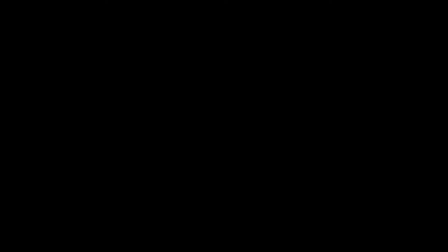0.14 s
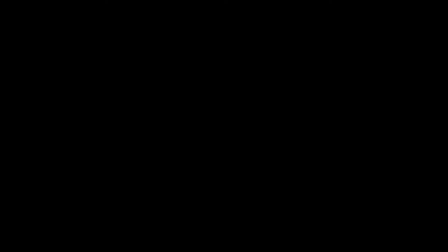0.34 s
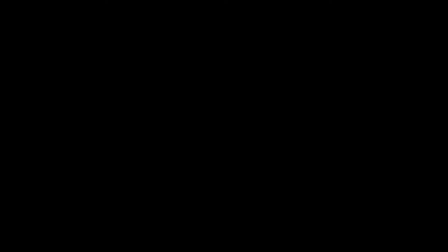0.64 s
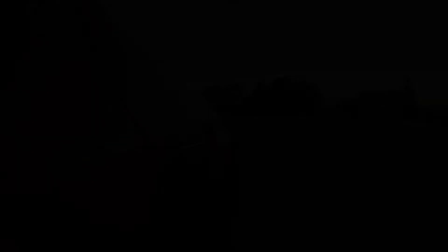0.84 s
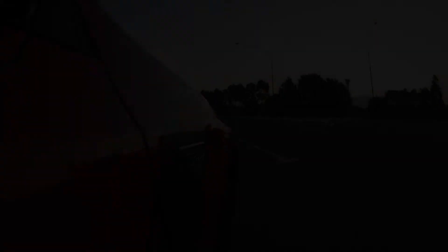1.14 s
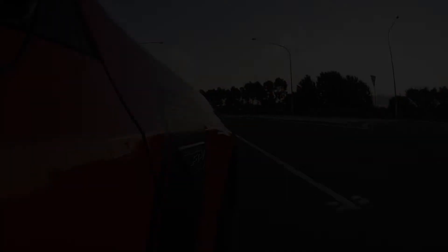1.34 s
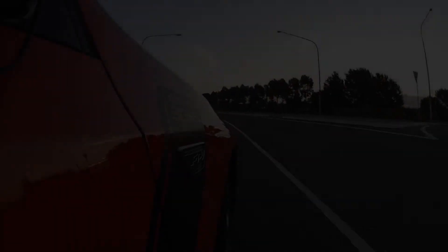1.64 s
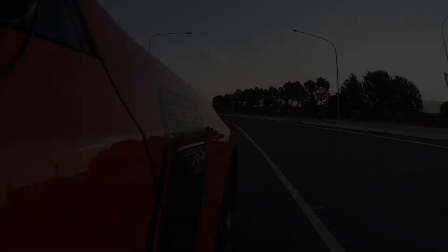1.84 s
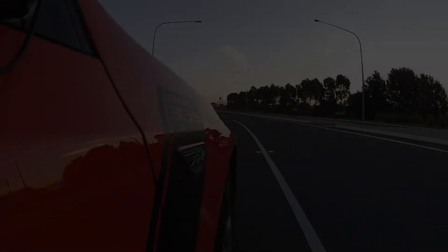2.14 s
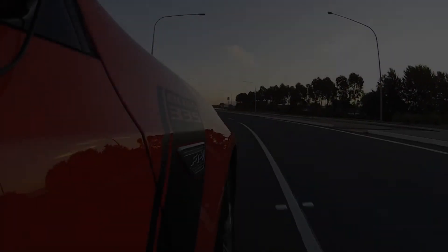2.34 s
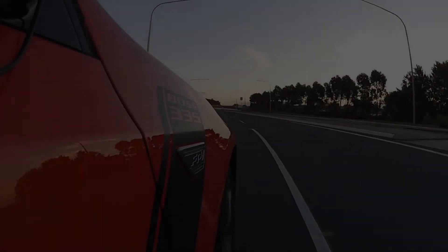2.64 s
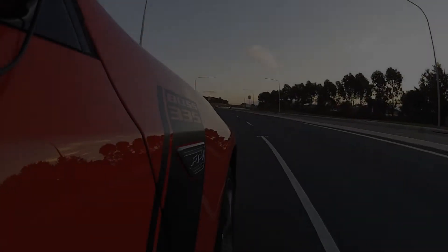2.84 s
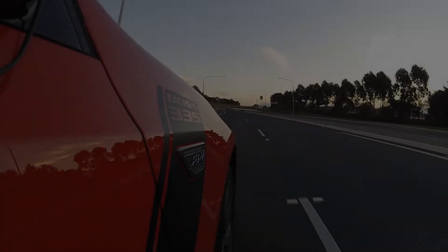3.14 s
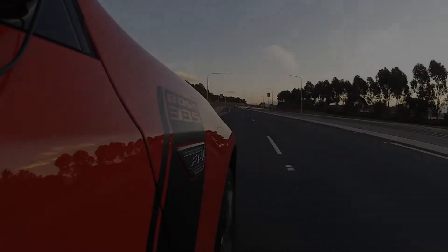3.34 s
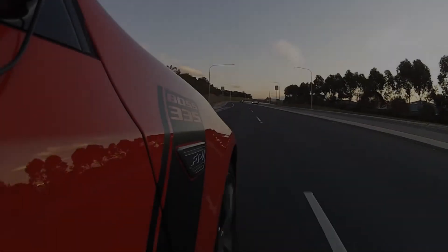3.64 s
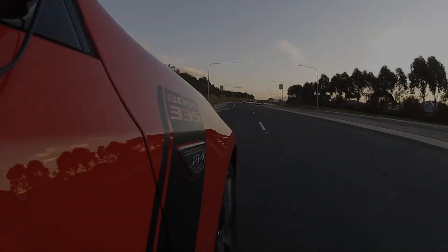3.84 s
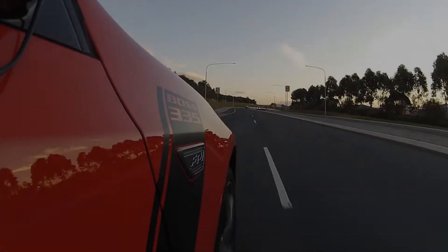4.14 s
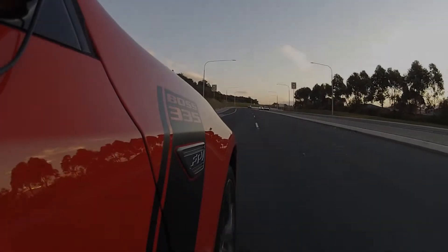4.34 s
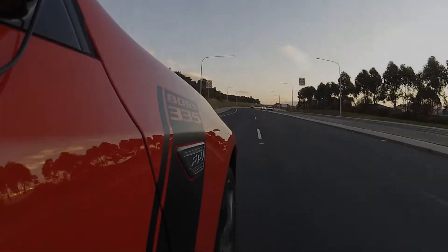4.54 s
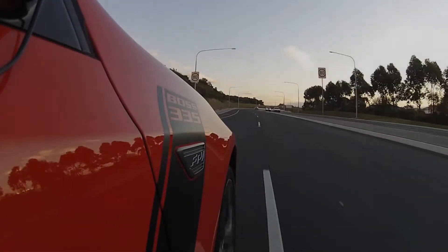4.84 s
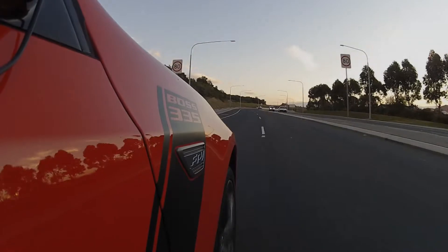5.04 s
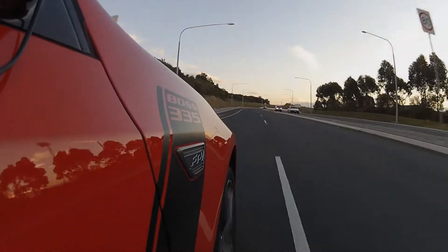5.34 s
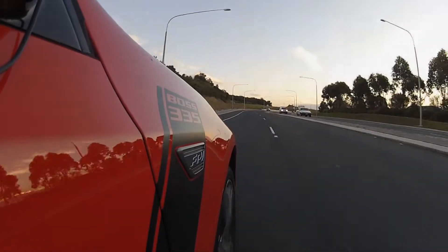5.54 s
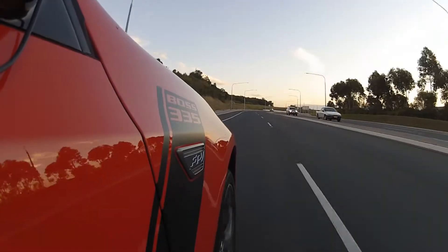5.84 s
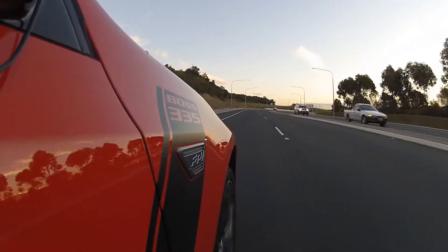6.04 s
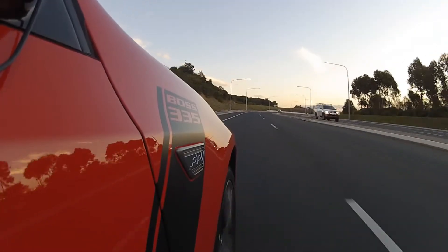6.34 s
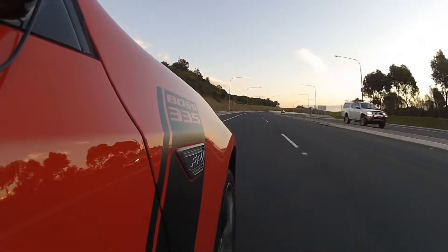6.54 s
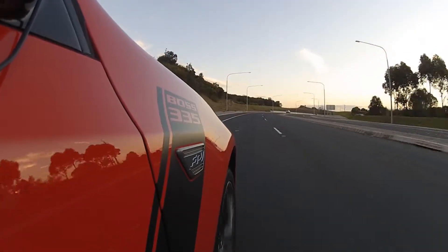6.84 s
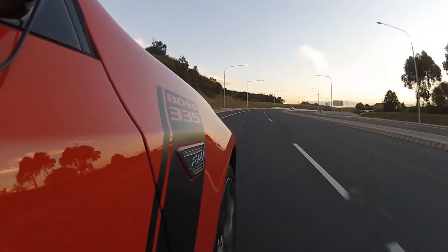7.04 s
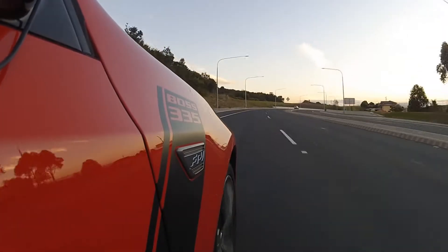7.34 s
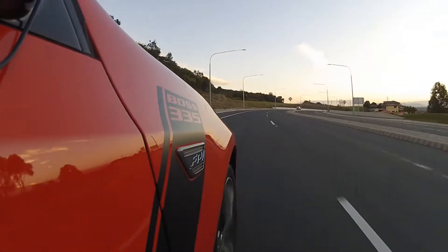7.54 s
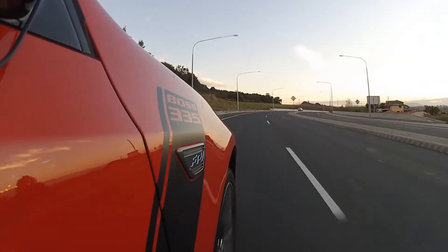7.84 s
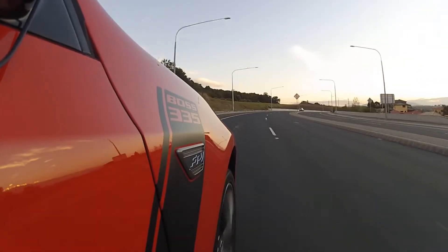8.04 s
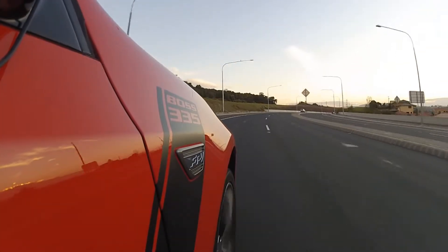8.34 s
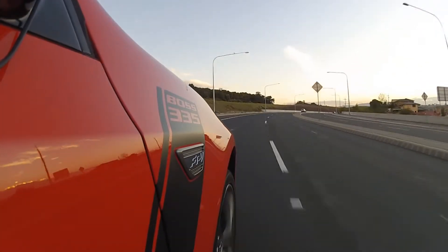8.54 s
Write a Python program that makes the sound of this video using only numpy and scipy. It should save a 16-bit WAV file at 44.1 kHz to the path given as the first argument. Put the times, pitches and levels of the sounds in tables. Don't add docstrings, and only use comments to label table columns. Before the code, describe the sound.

Silence first, then a supercharged V8 fades in, already accelerating. Its coarse exhaust roar and blower whine rise towards the redline, drop as the throttle shuts with a hiss, and bite into a second, longer pull. A small click falls early in that pull. Another lift and shift lead into a third pull that stops mid-acceleration. The microphone is fixed to the car's side on an open road, with wind and low body boom.

```python
import sys
import numpy as np
from scipy import signal
from scipy.fft import rfft, irfft, next_fast_len
from scipy.io import wavfile
from scipy.ndimage import uniform_filter1d

SR = 44100
rng = np.random.default_rng(int(sys.argv[2]) if len(sys.argv) > 2 else 0)


def gain_from_db(level_db):
    decades = np.asarray(level_db, float) / 20
    return 10 ** decades


def digitize_waveform(pressure):
    field = np.atleast_2d(pressure).T
    bounded = np.clip(field, -1, 1)
    quanta = np.round(bounded * 32767).astype(np.int16)
    wavfile.write(sys.argv[1], SR, quanta)


N = 382788

STEP = 32
CRUISE_HZ = 40
BLOWER_ORDER, ALTERNATOR_ORDER = 17.49, 26.8

# f/Hz, width/Hz, level/dB
BAY_RESONANCES = [(2650, 150, 5), (3650, 250, 4), (4250, 150, 5), (4850, 350, 7), (5450, 250, 11),
                  (6200, 200, 3), (7250, 250, 10), (8100, 350, 9), (12000, 600, 6)]
# t/s, swing/Hz, period/s, decay time/s
CLUTCH_BITES = [
    (4.21, 1.2, .265, .37),
    (7.705, 1.5, .225, .3),
]
# t/s, level/dB
GRIT = (5.0923, -10)


def clock():
    return np.arange(0, N + STEP, STEP) / SR


def fine(control):
    return np.interp(np.arange(N) / STEP, np.arange(len(control)), control)


def in_time(rows):
    s, *columns = np.transpose(rows)
    return [np.interp(clock(), s, column) for column in columns]


def swell(at, width):
    return np.exp(-((clock() - at) / width) ** 2)


def rms_one(x):
    return x / np.sqrt(np.mean(x ** 2) + 1e-20)


def drift(rate):
    pole = np.exp(-2 * np.pi * STEP * rate / SR)
    settling = 2000
    noise = rng.standard_normal(len(clock()) + settling)
    return rms_one(signal.lfilter([1], [1, -2 * pole, pole * pole], noise)[settling:])


def at_hz(points, hz):
    return np.interp(np.log(hz), np.log(np.array(points)[:, 0]), np.array(points)[:, 1])


def peaks_db(peaks, hz):
    return sum(db / (1 + (2 * (hz - centre_hz) / width_hz) ** 2) for centre_hz, width_hz, db in peaks)


def coloured(x, colour_db):
    size = next_fast_len(N + SR // 2, True)
    size += size % 2
    hz = np.maximum(np.fft.rfftfreq(size, 1 / SR), 1)
    cepstrum = irfft(np.log(gain_from_db(colour_db(hz))), size)
    cepstrum[1:size // 2] *= 2
    cepstrum[size // 2 + 1:] = 0
    return rms_one(irfft(rfft(x, size) * np.exp(rfft(cepstrum)), size)[:N])


def tone(cycles, order, level_db, waver_db, waver_rad):
    phase = 2 * np.pi * (order * cycles + rng.random()) + waver_rad * drift(4.05)
    waver = waver_db * (drift(5.06) + 0.69 * drift(27.0))
    return np.sqrt(2) * fine(gain_from_db(level_db + waver)) * np.sin(fine(phase))


def body_db(hz):
    # f/Hz, spectral density/dB
    body_colour = [(71, -57), (120, -31.5), (318, -3.5), (397, -8.5), (461, -5.5), (515, -8.5), (583, -7.5),
                   (716, 0), (821, -1), (1040, 2.5), (1190, -1), (1290, 6), (2180, -9), (2530, -7),
                   (3200, -30), (4160, -33), (7040, -120)]
    # f/Hz, width/Hz, level/dB
    pipe_modes = [(455, 45, 7), (737, 21, 3.5), (1203, 20, 3), (1264, 40, -2), (2480, 44, 1)]
    return at_hz(body_colour, hz) + peaks_db(pipe_modes, hz)


def exhaust_tones(speed, cycles, throttle):
    # order, under load/dB, throttle shut/dB
    order_levels = [(2.015, -54.5, -66), (3, -57, -47.5), (4.03, -47.5, -40.5), (5, -37, -44),
                    (6, -32, -30.5), (7, -35, -36), (9, -37, -47.5), (10, -24.5, -32.5), (11, -31.5, -33),
                    (12, -37.5, -36), (12.97, -44, -38), (13.85, -35, -38.5), (15.05, -28.5, -54),
                    (16.04, -28.5, -28), (16.7, -45, -46), (18.03, -29.5, -35.5), (18.9, -30, -30),
                    (19.86, -36.5, -35), (21.12, -29.5, -36.5), (22, -28.5, -33.5), (22.96, -31, -29.5),
                    (23.96, -26, -29), (25.12, -31, -42), (25.76, -30, -50), (26.97, -30.5, -28.5),
                    (28.04, -28, -30.5), (28.68, -30.5, -47.5), (28.95, -25, -35.5), (31.3, -28, -67),
                    (32.26, -38, -25.5)]
    # f/Hz, level/dB
    silencer = [(160, -50), (210, -36.5), (260, -27.5), (288, -31), (312, -25.5), (355, -17.5),
                (385, -26.5), (404, -36)]
    # cycle rate/Hz, level/dB
    uneven_growth = [(18, -43), (24, -28), (38, -26), (45, -25)]
    firing_coast_db = -29

    high = []
    for order in range(33, 50):
        if order != round(2 * BLOWER_ORDER):
            pull_db, coast_db = -34 - 1.1 * (order - 33) + 3 * rng.standard_normal(size=2)
            high.append((order, pull_db, coast_db))

    levels = {}
    for order, pull_db, coast_db in list(order_levels) + high:
        slide_db = body_db(order * speed) - body_db(order * 44.55)
        levels[order] = throttle * pull_db + (1 - throttle) * coast_db + 1.12 * slide_db
    low_db = 10 * np.log10(sum(gain_from_db(2 * levels[order]) for order in (5, 6, 7, 9, 10, 11, 12)))
    lift_db = at_hz(uneven_growth, speed) + lift_dips() - uniform_filter1d(low_db, size=60)
    uneven = sum(tone(cycles, order, levels[order] + lift_db, waver_db=2.5, waver_rad=0.0091 * order)
                 for order in levels)

    howl_db = -22 - 3 * np.abs(speed - 47.6) + 14 * (throttle - 1)
    howl = tone(cycles, 24, howl_db, waver_db=1.5, waver_rad=0.2)

    firing_db = throttle * at_hz(silencer, 8 * speed) + (1 - throttle) * firing_coast_db + 1.8 * lift_dips()
    return uneven + howl + tone(cycles, order=8, level_db=firing_db, waver_db=1.3, waver_rad=0.12)


def roar(cycles, roar_db, low_db):
    cylinder_db = [-1.5, 0.5, -0.5, -3.5, 0, -6, 3.5, -3]
    depth, crack = 0.55, 1.1

    firing = 8 * fine(cycles)
    number = firing.astype(int)
    strength, sharpness = rng.standard_normal((number[-1] + 1, 2)).T
    puffs = 1 - depth + depth * gain_from_db(0.52 * strength[number]) * 2 * np.sin(np.pi * firing) ** 2
    onsets = np.diff(number, prepend=0)
    cylinder = gain_from_db(np.array(cylinder_db)[number % len(cylinder_db)])
    cracks = onsets * (0.5 + sharpness[number]) * cylinder
    gas = coloured(puffs * rng.standard_normal(N) + crack * rms_one(cracks), body_db)
    low = signal.sosfilt(signal.butter(2, 560, fs=SR, output="sos"), gas)
    return fine(gain_from_db(roar_db - 3.5)) * (gas + (fine(gain_from_db(low_db + 2.5)) - 1) * low), puffs


def whine(speed, cycles, order, partials, level_db):
    # f/Hz, level/dB
    bay_colour = [(590, -34), (1000, 1), (1190, -10), (1340, 11), (2180, -15), (2550, -15), (3480, -25),
                  (4960, -31.5), (5500, -27), (12000, -51.5), (15600, -81), (22000, -120)]

    def bay_db(hz):
        return at_hz(bay_colour, hz) + peaks_db(BAY_RESONANCES, hz)

    return sum(tone(cycles, k * order, level_db + db + bay_db(k * order * speed),
                    waver_db=2.4, waver_rad=0.3 * k) for k, db in partials)


def blower(speed, cycles, throttle, hiss_db):
    # from t/s, partials 1 to 4 level/dB
    pull_balance = [
        (0, -5, -2, -1, -7),
        (1.35, -7, -4, -7, -17),
        (2.55, -8, -4, -16, -18),
        (4.18, 1, -1, -5, -6),
        (7.68, 6, -3, -4, -6),
    ]
    # f/Hz, level/dB
    intake_colour = [(330, -34), (480, -32), (700, -26), (1100, -22), (1700, -21.5), (2100, -25),
                     (2800, -28), (3550, -52)]
    # f/Hz, width/Hz, level/dB
    intake_modes = [(575, 90, -20), (690, 70, 6), (768, 25, -7), (1150, 110, 6), (1260, 50, -5),
                    (1530, 70, 3), (1985, 70, -15), (1620, 40, -3), (2255, 50, 5), (2340, 80, -13),
                    (2470, 70, 3), (2640, 60, -4), (2830, 80, 3)]
    # partial number, level over the bay hiss/dB
    top_partials = [(5, 3), (6, 0), (7, -6), (8, -4)]
    unboosted_db = -18

    def intake_db(hz):
        return at_hz(intake_colour, hz) + peaks_db(intake_modes, hz)

    row = np.searchsorted([row[0] for row in pull_balance], clock(), side="right") - 1
    balance_db = uniform_filter1d(np.array(pull_balance)[row, 1:], size=140, axis=0).T
    balance_db = balance_db + unboosted_db * uniform_filter1d(1 - throttle, size=200)
    low = sum(tone(cycles, k * BLOWER_ORDER, db + intake_db(k * BLOWER_ORDER * speed),
                   waver_db=1.4 + 0.3 * k, waver_rad=0.29 * k) for k, db in enumerate(balance_db, 1))
    top_db = hiss_db + 6.5 + 9 * (throttle - 1) + np.minimum(speed - 24, 0)
    return low + whine(speed, cycles, BLOWER_ORDER, top_partials, top_db)


def alternator(speed, cycles, hiss_db):
    # partial number, level over the bay hiss/dB
    pole_partials = [(2, -8), (3, -3), (4, 3.5), (5, .5), (6, 2), (7, 1), (8, 0), (9, -1), (10, -2),
                     (11, -3)]
    level_db = hiss_db + 4.5 + 0.6 * np.minimum(speed - 40, 0)
    return whine(speed, cycles, ALTERNATOR_ORDER, pole_partials, level_db)


def bay_hiss(hiss_db, puffs):
    # f/Hz, spectral density/dB
    hiss_colour = [(1290, -35), (2200, -34), (2550, -0.5), (3510, -8), (4950, -12.5), (5510, -12.5),
                   (6390, -18), (7230, -19.5), (9470, -29.5), (14200, -38), (15600, -56)]
    noise = (1.3 + 0.3 * puffs) * rng.standard_normal(N)
    hiss = coloured(noise, lambda hz: at_hz(hiss_colour, hz) + 0.079 * peaks_db(BAY_RESONANCES, hz))
    return fine(gain_from_db(hiss_db + 1.03 * drift(11.0))) * hiss


def wind():
    # f/Hz, spectral density/dB
    rumble_colour = [(12, -45), (20, -28), (129, -5.5), (180, -4), (230, -14), (400, -120)]
    rumble_db = -77 + 3.3 * clock() + 5 * swell(GRIT[0], 0.033)
    noise = coloured(rng.standard_normal(N), lambda hz: at_hz(rumble_colour, hz))
    return fine(gain_from_db(rumble_db + 5.0 + 3 * drift(5.35))) * noise


def panel_boom():
    # t/s, level/dB
    road_joints = [(.93, 12), (1.33, 20), (1.68, 16), (1.9, 7), (3.12, 17), (4.4, 7), (6.19, 11),
                   (7.35, 13.5), (7.6, 13), (8.62, 3)]
    mode_hz, width_hz, bump_s = 90, 11, 0.14
    boom_db = -62 + 0.9 * clock() + sum(db * swell(at, bump_s) for at, db in road_joints)
    boom = coloured(rng.standard_normal(N),
                    lambda hz: -20 * np.log10(1 + (2 * (hz - mode_hz) / width_hz) ** 2))
    return fine(gain_from_db(boom_db - 4.5)) * boom


def lift_dips():
    # t/s, dip/dB, recovery time/s
    throttle_lifts = [
        (3.444, 4, 0.18),
        (6.9, 7, 0.066),
    ]
    onset_s = 0.012
    dips = 0
    for at, dip_db, recovery_s in throttle_lifts:
        lag = np.maximum(clock() - at, 0)
        dips = dips - dip_db * (1 - np.exp(-lag / onset_s)) * np.exp(-lag / recovery_s)
    return dips


def shudder():
    out = 0
    for at, swing, period, dying in CLUTCH_BITES:
        lag = clock() - at
        drag = np.exp(-abs(lag) / 0.06)
        ringing = np.exp(-abs(lag) / dying) * np.cos(2 * np.pi * lag / period)
        out = out - swing * np.where(lag < 0, drag, ringing)
    return out


def tick():
    lag = np.arange(N) - round(GRIT[0] * SR)
    return gain_from_db(GRIT[1]) * np.where(lag < 0, np.exp(-abs(lag) / 4.0), -0.7 * np.exp(-abs(lag) / 2.5))


def scene():
    # t/s, cycle rate/Hz
    speed_points = [(0.8, 17.7), (1.02, 20.0), (1.28, 21.2), (1.74, 27.0), (2.07, 29.6), (2.36, 34.0),
                    (2.7, 37.9), (3.09, 44.15), (3.43, 48.4), (3.64, 45.9), (4.04, 39.3), (4.21, 30.8),
                    (5.16, 37.25), (6.8, 50.5), (7.07, 49.4), (7.58, 41.2), (7.71, 37.6), (8.68, 40.9)]
    # t/s, opening/0-1
    throttle_points = [(0, 1), (3.44, 1), (3.48, 0), (4.14, 0), (4.22, 1), (6.86, 1), (6.99, 0), (7.64, 0),
                       (7.72, 1), (8.68, 1)]
    fade_start_s, fade_s = 0.76, 1.82
    hiss_rise_db, hiss_lag_s, bite_db, bite_s = 4, 0.13, 3.5, 0.11

    (road,), (throttle,) = in_time(speed_points), in_time(throttle_points)
    speed = road + shudder()
    cycles = np.cumsum(speed) * STEP / SR

    bites_db = sum(bite_db * swell(row[0], bite_s) for row in CLUTCH_BITES)
    roar_db = -16 - 0.0659 * (speed - CRUISE_HZ) + 2.5 * (1 - throttle) + bites_db
    low_db = -5 - 0.36 * (speed - CRUISE_HZ) + 2.9 * drift(1.0)
    gas, puffs = roar(cycles, roar_db + lift_dips() + 1.13 * drift(6.2), low_db)

    shut_late = np.interp(clock() - hiss_lag_s, clock(), 1 - throttle)
    shut_soon = np.interp(clock() + 0.05, clock(), 1 - throttle)
    bay_db = -31.5 + 0.21 * (clock() - 4) + 0.086 * np.maximum(speed - CRUISE_HZ, -9)
    hiss_db = bay_db + hiss_rise_db * np.minimum(shut_late, shut_soon) + 0.5 * lift_dips()

    tones = exhaust_tones(speed, cycles, throttle)
    tones = tones + (0.78 + 0.25 * puffs) * blower(speed, cycles, throttle, bay_db)
    tones = tones + alternator(speed, cycles, bay_db + 3.5 * (1 - throttle))
    flow = gas + bay_hiss(hiss_db, puffs) + wind() + panel_boom()
    fade = np.clip((np.arange(N) / SR - fade_start_s) / fade_s, 0, 1)
    return (fade * (flow + tones) + tick())[None]


def roll_off(x):
    return signal.sosfilt(signal.butter(12, 15770, fs=SR, output="sos"), x)


def record(dry):
    lopsided = signal.sosfilt(signal.butter(2, 200, "high", fs=SR, output="sos"), dry ** 2)
    bent = dry + 0.16 * lopsided
    return roll_off(1.342 * np.tanh(bent / 1.307))


dry = scene()
out = record(dry)
digitize_waveform(out)
```